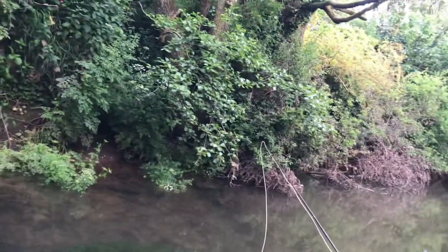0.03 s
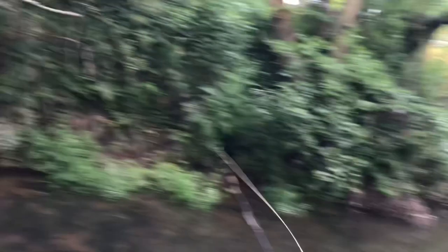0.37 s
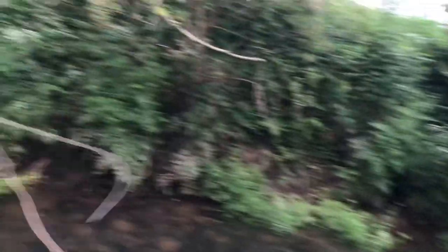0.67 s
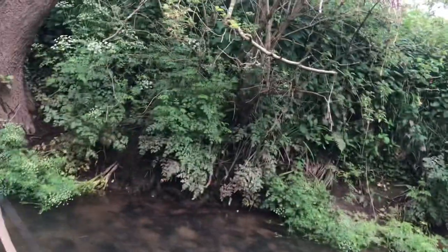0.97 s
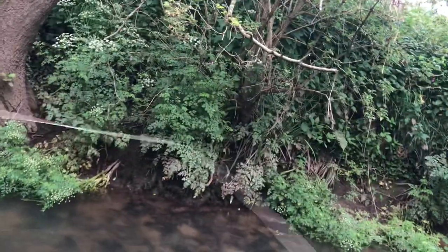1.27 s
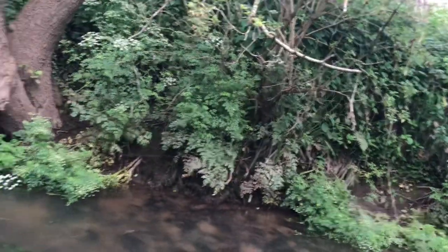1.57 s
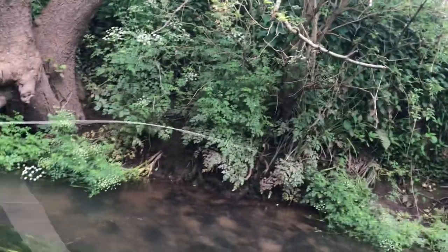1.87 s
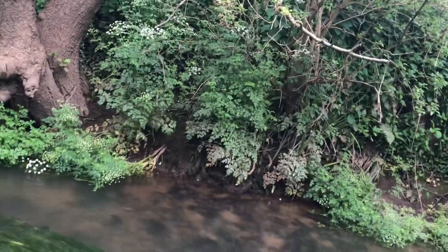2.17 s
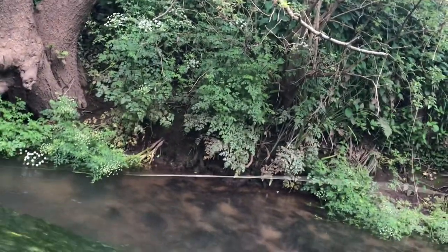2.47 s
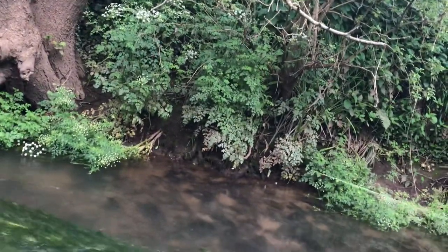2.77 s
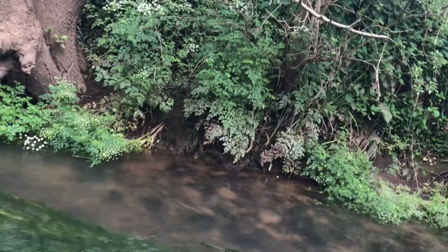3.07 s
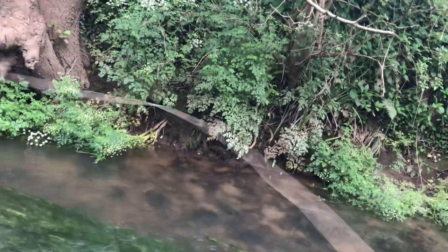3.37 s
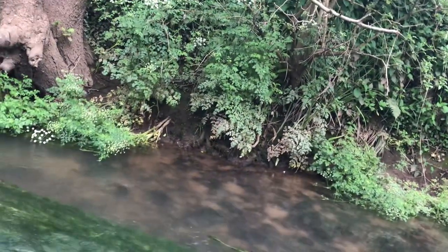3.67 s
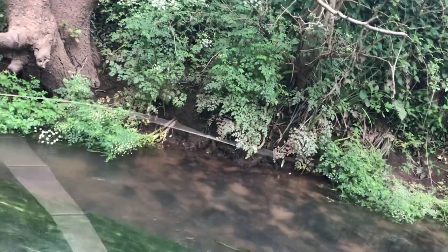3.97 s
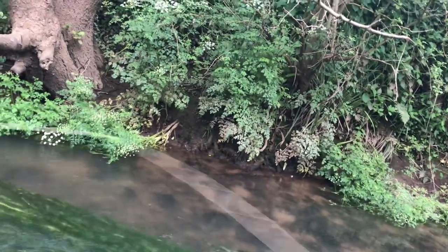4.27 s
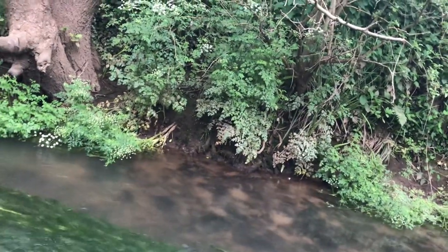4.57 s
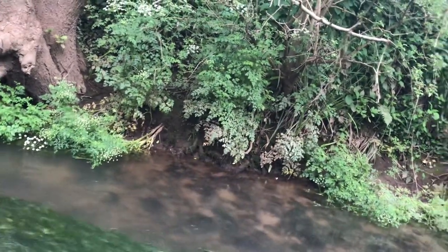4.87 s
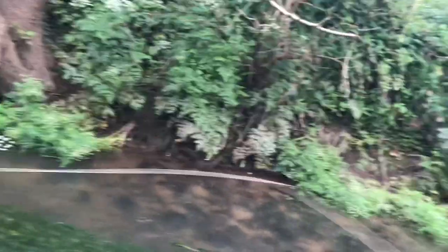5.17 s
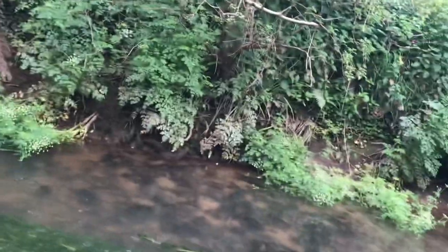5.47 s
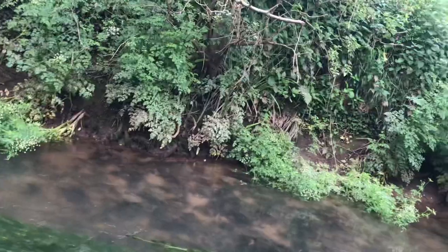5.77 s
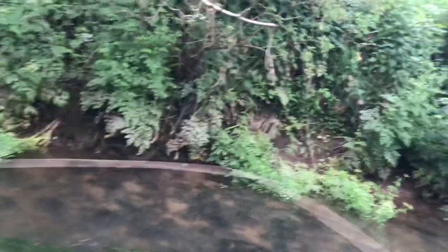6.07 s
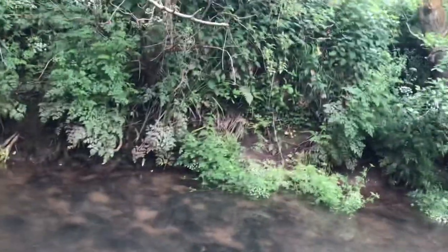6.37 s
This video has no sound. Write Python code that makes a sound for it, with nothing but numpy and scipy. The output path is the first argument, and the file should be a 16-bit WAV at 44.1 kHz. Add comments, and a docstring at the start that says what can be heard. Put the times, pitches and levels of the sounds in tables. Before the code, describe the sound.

A soft murmur of slow water and open air runs throughout, about six and a half seconds, with faint far bird whistles. At 0.5 seconds a songbird gives a short harsh rasp, running into a rapid, high, slightly hoarse trill from 0.7 to 1.8 seconds. After faint twitters near 3.2 seconds, it sings a louder phrase from 3.5 to 5.3 seconds: quick notes dropping in pitch, then high, partly buzzy whistles stepping downward, echoing lightly among trees. Close by, a fly line slides through rod rings in short hissing pulls with thin falling zips, faint from about 1 second and stronger from 3.7 to 6.2 seconds. It ticks sharply against the rod around 2.4, 3.9 and 4.7 seconds, and several times after 5.9. Small water plops come near 3, 3.3 and 5.2 seconds and just after 6.

```python
"""A songbird on a wooded river bank gives a harsh rasp, a rapid two-voiced trill, then a louder phrase of
falling whistles. The two sides of its syrinx sound the trill together; trunks and leaves scatter the song.
Close by, a fly line is cast and drawn in: sliding friction in the rod rings makes it hiss, and its impacts
on the rod tick. Air pockets resonate as small plops. Behind lie faint far whistles and twitters,
lingering echoes of the song and the murmur of slow water."""
import sys
import numpy as np
from scipy import signal
from scipy.fft import rfft, irfft, next_fast_len
from scipy.io import wavfile
from scipy.ndimage import uniform_filter1d, map_coordinates

SR = 44100
rng = np.random.default_rng(int(sys.argv[2]) if len(sys.argv) > 2 else 0)


def waveform_to_disk(signal):
    """Save audio, clipped to [-1, 1], as 16-bit WAV at the path in sys.argv[1]."""
    frames = np.transpose(np.atleast_2d(signal))
    scaled = np.clip(frames, -1, 1) * 32767
    samples = np.round(scaled).astype(np.int16)
    wavfile.write(sys.argv[1], SR, samples)


N = 287701
T = np.arange(N) / SR

# Whistles of the loud phrase:
# (time [s], duration [s], start pitch [Hz], middle pitch [Hz], end pitch [Hz], level [dB], buzz depth [Hz])
PHRASE_NOTES = [(3.457, .045, 6390, 6585, 6420, -57, 5), (3.497, 0.036, 5960, 6440, 6450, -52.5, 0),
                (3.53, 0.041, 5910, 6114, 5790, -48.5, 0), (3.547, 0.025, 6030, 5220, 3540, -44.5, 0),
                (3.614, 0.023, 3990, 3820, 3840, -38.5, 11), (3.634, 0.021, 3650, 3310, 3090, -45.5, -3),
                (3.681, 0.0284, 3290, 3037, 3280, -41, 36), (3.758, 0.031, 2896, 2960, 3510, -46, -2),
                (3.877, 0.046, 3090, 3087, 3100, -54.5, 0), (4.006, 0.044, 5740, 6590, 6480, -48, 26),
                (4.05, 0.087, 6455, 6430, 6180, -42, 260), (4.221, .033, 6480, 6650, 6590, -43, 0),
                (4.227, 0.047, 6320, 6235, 5940, -40, 53), (4.246, 0.066, 6200, 6116, 6260, -41.5, 353),
                (4.368, 0.049, 6160, 6290, 6420, -42.5, 0), (4.39, 0.098, 6215, 5964, 5800, -42.5, -2),
                (4.592, .11, 6160, 5817, 5740, -45.5, 55), (4.596, 0.13, 7460, 6740, 6500, -49.5, 72),
                (4.828, .018, 5830, 6260, 6360, -49.5, 55), (4.831, 0.049, 5380, 5110, 5040, -44.5, 101),
                (4.866, 0.086, 4960, 4796, 4770, -44, 15), (4.97, 0.057, 4925, 5090, 5006, -44.5, 7),
                (5.082, 0.04, 3947, 4130, 4246, -40.5, -2), (5.107, 0.1, 4160, 4095, 4093, -44, 29),
                (5.196, 0.098, 4510, 4640, 4540, -49.5, 4)]
# Faint far whistles and twitters, and lingering echoes of the songbird's trill and phrase
# (the steady tones at 1.869, 3.88 and 4.245 s); columns as in PHRASE_NOTES
FAR_CALLS_AND_ECHOES = [(-.02, 0.092, 1960, 1880, 1840, -70.5, 0),
                        (.21, 0.051, 2520, 2517, 2560, -72.5, -3), (.401, .096, 2680, 2620, 2760, -76, 0),
                        (1.869, 0.14, 4120, 3995, 4010, -72, 3), (2.6, 0.12, 2297, 2268, 2190, -69.5, -2),
                        (2.76, 0.092, 2270, 2140, 1936, -66.5, 69),
                        (3.145, .03, 4880, 3800, 3440, -58, 500),
                        (3.21, 0.071, 5900, 5820, 5800, -68.5, 398),
                        (3.277, .042, 6070, 4780, 3780, -56.5, 495),
                        (3.384, 0.032, 4750, 5230, 5740, -58.5, 400),
                        (3.65, 0.174, 2130, 2140, 2230, -72.5, -2),
                        (3.88, 0.185, 3380, 3410, 3380, -71.5, 0), (4.09, 0.24, 1923, 2146, 1910, -71.5, 3),
                        (4.245, .11, 3520, 3545, 3530, -71.5, 0),
                        (6.451, 0.093, 2920, 3450, 3670, -72, 157)]
# Syllables of the trill: (time [s], level [dB])
TRILL_ONSETS = [(.72, -55), (0.791, -54), (.868, -57.5), (0.947, -57), (1.045, -59.5), (1.122, -57.5),
                (1.225, -56.5), (1.312, -53), (1.401, -53), (1.49, -52), (1.589, -52.5), (1.686, -51),
                (1.775, -50.5)]
# Course of one syllable, sung by both sides of the syrinx: (time from onset [s], upper pitch [Hz],
# lower pitch [Hz], upper relative level [dB], lower relative level [dB], pitch roughness [fraction])
SYLLABLE_SHAPE = [(0, 6000, 3450, -11, -16, .025), (.006, 6650, 3750, -3, -6, .015),
                  (.014, 7050, 3880, 0, -4, .015), (.022, 6900, 3650, 0, -13, .04),
                  (.028, 5700, 3200, 0, -8, .08), (.034, 5000, 2650, 0, -4, .085),
                  (.042, 3900, 2000, -14, -16, .09)]
# Spectra of the bird's rasp and the line's hiss and rub: (frequency [Hz], relative spectral density [dB])
RASP_SPECTRUM = [(500, -40), (900, -15), (1300, -11), (1700, -11.5), (2300, -10.5), (3000, -0.5),
                 (3600, -5.5), (4200, -5.5), (4800, -19), (5900, -15), (7000, -25), (8300, -21.5),
                 (9500, -51), (13000, -58)]
HISS_SPECTRUM = [(1000, -23.5), (2500, -9.5), (4600, -8), (6600, -6), (7700, -8.5), (9400, -6.5),
                 (10400, -11), (11400, -4), (13000, -3.5), (15800, -8)]
RUB_SPECTRUM = [(600, -19), (1100, -8.5), (1600, -7), (2500, -5.5), (3500, -4.5), (6000, -7.5),
                (10000, -22)]
# Pulls of line through the rings: (time [s], duration [s], hiss gain [dB], rub gain [dB])
LINE_PULLS = [(.95, 0.68, -92, -62.5), (1.753, .19, -54, -70), (2.186, 0.098, -76, -68),
              (2.352, 0.2, -73, -69.5), (2.503, 0.093, -65, -71), (2.764, .17, -63, -63.5),
              (2.837, 0.15, -56.5, -75), (3.126, 0.057, -59.5, -67), (3.17, 0.15, -65, -66),
              (3.355, 0.046, -63, -60), (3.74, 0.25, -52, -59.5), (3.919, 0.034, -49, -56),
              (3.929, 0.14, -56.5, -63.5), (4.283, 0.23, -53.5, -59), (4.46, 0.14, -70, -60),
              (4.564, 0.2, -49, -59.5), (4.662, 0.037, -45, -74), (4.68, 0.23, -52, -57.5),
              (4.833, 0.17, -64, -64), (4.992, .32, -50, -60.5), (5.418, 0.29, -53.5, -62.5),
              (5.64, 0.11, -65.5, -69), (5.759, .16, -59.5, -66.5), (5.903, .17, -55.5, -79),
              (6.046, 0.094, -46.5, -55.5), (6.115, 0.1, -56.5, -75)]
# Creep of the slack line between pulls: (time [s], relative level [dB])
LINE_CREEP = [(0, -7), (.6, -0.5), (1.5, 2), (2.6, -3.5), (3.1, 3.5), (5.4, 7.5), (6.5, 2)]
# Glides of the slowing line: (time [s], duration [s], start frequency [Hz], level [dB])
LINE_ZINGS = [(1.371, 0.034, 13500, -66), (1.837, 0.023, 6200, -62.5), (1.85, .06, 3640, -68),
              (1.864, .11, 13000, -66.5), (2.017, 0.035, 2650, -66), (2.356, 0.16, 12000, -71.5),
              (2.43, 0.055, 4400, -71), (2.86, 0.031, 6580, -65), (2.881, .04, 4300, -64),
              (2.898, 0.12, 13500, -66.5), (3.993, 0.096, 14300, -62.5), (4.339, .046, 2300, -68),
              (4.428, 0.065, 13400, -64), (5.497, 0.083, 15500, -55), (5.526, 0.046, 9600, -53.5),
              (5.564, 0.14, 5400, -67), (5.675, 0.1, 14000, -65.5)]
# Impacts of the line on the rod: (time [s], gain [dB], extra gain of the body [dB])
ROD_TAPS = [(2.434, -40.5, -7), (3.185, -56, 8), (3.927, -35.5, 2), (3.936, -43, -8), (4.681, -25, -30),
            (4.718, -23, -8.5), (4.745, -41, 11), (4.872, -35, -1), (5.276, -45, -2), (5.524, -41, -25),
            (5.92, -43, -14), (6.102, -30, -17), (6.166, -44.5, 2.5), (6.186, -32.5, -10),
            (6.283, -39.5, -5.5), (6.430, -46, -24), (6.447, -43, -32)]
# Air pockets in the water: (time [s], relative level [dB], start pitch [Hz], 60 dB decay time [s])
AIR_POCKETS = [(2.666, -55, 268, 0.045), (2.994, -42.5, 572, 0.018), (3.057, -50, 290, 0.017),
               (3.303, -43.5, 486, 0.016), (3.317, -51.5, 366, 0.054), (4.723, -47, 660, 0.012),
               (5.212, -39.5, 503, 0.02), (6.052, -39, 570, 0.022), (6.277, -41, 486, 0.01),
               (6.284, -38.5, 950, 0.0086)]
# Spectrum of slow water and open air: (frequency [Hz], relative spectral density [dB])
RIVER_SPECTRUM = [(15, -32), (25, -3), (59, -0.5), (165, -10), (194, -9), (255, -9), (500, -14.5),
                  (620, -14), (1640, -22), (1820, -19.5), (2260, -25.5), (2590, -24), (6490, -33),
                  (8970, -29), (15800, -37.5)]
# Slow swell of the murmur: (time [s], relative level [dB])
RIVER_SWELL = [(0.0, -70.5), (1.05, -68), (4.28, -70), (5.9, -70), (6.21, -66), (6.52, -69.5)]


def whistle(length, start_hz, middle_hz, end_hz, buzz_hz, overtone_db,
            flutter_hz=135, edge_s=0.0013, unsteady=0.0016):
    """Frequency modulation: fast flutter of the syrinx adds a buzz to a gliding, nearly pure tone."""
    t = np.arange(int(length * SR)) / SR
    hz = np.polyval(np.polyfit([0, .5, 1], [start_hz, middle_hz, end_hz], 2), t / length)
    flutter = np.sin(cycles(flutter_hz * (1 + 0.14 * wobble(64, len(t)))))
    waver = 1 + unsteady * wobble(256, len(t))
    phase = cycles(hz * waver + buzz_hz * flutter)
    gate = np.sin(np.pi / 2 * np.clip(np.minimum(t, length - t) / edge_s, 0, 1)) ** 2
    return unit(gate * (np.sin(phase) + amp(overtone_db) * np.sin(2 * phase)))


def phrase(overtone_db=-19):
    """Harmonic distortion: in the loud run of whistles, high notes sung hard are the least pure."""
    out = np.zeros(N)
    for s, length, start, middle, end, db, buzz in PHRASE_NOTES:
        strain_db = 1.8 * (db + 40.5) + 30 * np.log2(middle / 6300)
        note = amp(db) * whistle(length, start, middle, end, buzz, overtone_db + strain_db)
        add(out, s, among_trees(note, wet_db=1.5, t60=0.3, far_db=-9.5))
    return out


def trill(sum_tone_db=-16, first_wet_db=6, rise_s=0.138, hoarseness=0.01):
    """Biphonation: two voices arch, then plunge and break up; their coupling adds a weak sum tone."""
    out = np.zeros(N)
    t = np.arange(int(SYLLABLE_SHAPE[-1][0] * SR)) / SR
    upper_hz, lower_hz, upper_db, lower_db, roughness = curves(SYLLABLE_SHAPE, t)
    first_s, last_s = TRILL_ONSETS[0][0], TRILL_ONSETS[-1][0]
    for s, db in TRILL_ONSETS:
        age = s - first_s
        detune = 1 + .012 * rng.standard_normal()
        tuning = detune * np.interp(age, [0, rise_s], [.94, 1])  # the trill starts a little flat
        veil = 1 - age / (last_s - first_s)  # early syllables are hoarser and richer in echoes
        jitter = roughness + hoarseness * (.5 + veil)
        upper_phase = cycles(tuning * upper_hz * (1 + jitter * wobble(1410, len(t))))
        lower_phase = cycles(tuning * lower_hz * (1 + jitter * wobble(1393, len(t))))
        sum_tone = amp(sum_tone_db) * np.sin(upper_phase + lower_phase)
        voices = amp(upper_db) * np.sin(upper_phase) + amp(lower_db) * (np.sin(lower_phase) + sum_tone)
        add(out, s, among_trees(amp(db) * unit(voices), wet_db=veil * first_wet_db, t60=0.42, far_db=-12))
    return out


def rasp(start_s=0.547, level_db=-49.5, attack_s=0.032, hold_s=.14, t60=0.41, rough_db=-0.5):
    """Aperiodic sound has no pitch: a scrape of noise opens the song, swells and decays exponentially."""
    grain = rng.standard_normal(N) * amp(rough_db * wobble(350))
    age = np.maximum(T - start_s, 0)
    swell = 1 - np.exp(-age / attack_s)
    decay_db = 60 * np.maximum(age - hold_s, 0) / t60
    return swell * amp(level_db - decay_db) * coloured(grain, RASP_SPECTRUM)


def among_trees(x, wet_db, t60, far_db, woods_t60=.55):
    """Scattering: echoes off near trunks and leaves follow the direct sound, with a tail from far woods."""
    t = np.arange(SR * 3 // 4) / SR
    spray = rng.standard_normal(len(t)) ** 3  # cubing makes a few echoes stand out
    near = spray * amp(-60 * t / t60) * (1 - np.exp(-t / 0.0012))
    far = rng.standard_normal(len(t)) * amp(-60 * t / woods_t60) * (1 - np.exp(-t / .05))
    response = amp(wet_db) * near / np.linalg.norm(near) + amp(far_db) * far / np.linalg.norm(far)
    response[0] = 1  # the direct path
    return signal.fftconvolve(x, response / np.linalg.norm(response))


def fly_line(rub_db=-2, free_db=-4, held_db=1):
    """Sliding friction: line running through the rings gives a bright hiss over a duller rub."""
    hiss_gain, rub_gain = pull_gains()
    hiss = coloured(friction(), HISS_SPECTRUM)
    rub = coloured(friction(), RUB_SPECTRUM)
    low_band = filtered(hiss, lambda hz: 1 / (1 + (hz / 7500) ** 6))
    # free line in the air hisses thinly; drawn in by hand at the end it is fuller
    grip = amp(np.interp(T, [5.2, 5.5], [free_db, held_db]))
    return hiss_gain * (hiss + (grip - 1) * low_band) + amp(rub_db) * rub_gain * rub


def pull_gains(hiss_exponent=1.2, rub_exponent=0.74, idle_hiss_db=-78, idle_rub_db=-72, uneven_db=4):
    """Power law: hiss and rub grow with the line's speed in each pull; slack line creeps in between."""
    creep = amp(curves(LINE_CREEP)[0] + uneven_db * wobble(6.3))
    hiss_power = (amp(idle_hiss_db) * creep) ** 2
    rub_power = (amp(idle_rub_db) * creep) ** 2
    for s, length, hiss_db, rub_db in LINE_PULLS:
        speed = np.abs(np.sin(np.linspace(0, np.pi, int(length * SR))))
        add(hiss_power, s, (amp(hiss_db) * speed ** hiss_exponent) ** 2)
        add(rub_power, s, (amp(rub_db) * speed ** rub_exponent) ** 2)
    return np.sqrt(hiss_power), np.sqrt(rub_power)


def friction(grain_db=1.6, flicker_db=1.6, patch_db=2.5):
    """Random amplitude modulation: fine friction grains, made patchy in both frequency and time."""
    grains = rng.standard_normal(N) * amp(grain_db * wobble(1500) + flicker_db * wobble(70))
    spectra = signal.stft(grains, nperseg=512)[2]
    patches = uniform_filter1d(rng.standard_normal(spectra.shape), size=6, axis=0)  # about 500 Hz wide
    patches = uniform_filter1d(patches, size=6, axis=1)  # about 35 ms long
    return signal.istft(spectra * amp(patch_db * unit(patches)), nperseg=512)[1][:N]


def zings(spread=.15, end_ratio=.57):
    """Passage rate sets pitch: the line's texture crosses a ring ever more slowly, so a noise band falls."""
    out = np.zeros(N)
    for s, length, start_hz, db in LINE_ZINGS:
        size = int(length * SR)
        hz = np.geomspace(start_hz, end_ratio * start_hz, size)
        phase, width_hz = cycles(hz), spread * (hz[0] + hz[-1])
        band = wobble(width_hz, size) * np.cos(phase) + wobble(width_hz, size) * np.sin(phase)
        add(out, s, amp(db) * unit(band * np.sin(np.linspace(0, np.pi, size))))
    return out


def ticks(snap_db=-6, knock_db=-5, t60=.012):
    """Impact excitation: the line taps the rod, giving a bright, quickly damped snap with a little body."""
    out = np.zeros(N)
    t = np.arange(SR // 20) / SR
    for s, db, body_db in ROD_TAPS:
        snap = coloured(rng.standard_normal(len(t)), [(1000, -28), (5000, -13), (10000, 2), (13000, 6.5)])
        body = coloured(rng.standard_normal(len(t)), [(700, -9), (1600, 2.5), (4000, 3.5), (8000, -4.5)])
        add(out, s, amp(db - 60 * t / t60) * (amp(snap_db) * snap + amp(body_db + knock_db) * body))
    return out


def plops(rise_per_s=3, attack_s=0.0005, gain_db=3):
    """Bubble resonance: each plop is a short-lived air pocket whose pitch rises as it rings."""
    out = np.zeros(N)
    t = np.arange(SR // 12) / SR
    for s, db, hz, t60 in AIR_POCKETS:
        envelope = amp(db + gain_db - 60 * t / t60) * (1 - np.exp(-t / attack_s))
        add(out, s, envelope * np.sin(cycles(hz * (1 + rise_per_s * t))))
    return out


def far_calls_and_echoes():
    """Reverberation: faint far whistles and twitters, and lingering echoes of the trill and phrase."""
    out = np.zeros(N)
    for s, length, start, middle, end, db, buzz in FAR_CALLS_AND_ECHOES:
        note = whistle(length, start, middle, end, buzz, overtone_db=-28, edge_s=.008, unsteady=0.0032)
        add(out, s, among_trees(amp(db) * note, wet_db=2.5, t60=0.13, far_db=-1.5))
    return out


def river(gain_db=4, ripple_db=1):
    """Broadband ambient noise: slow water and open air make a soft, slightly uneven murmur."""
    level_db = curves(RIVER_SWELL)[0] + gain_db + ripple_db * wobble(14)
    return amp(level_db) * coloured(rng.standard_normal(N), RIVER_SPECTRUM)


def amp(db):
    """Decibel law: amplitude grows tenfold every 20 dB."""
    return 10 ** (np.asarray(db) / 20)


def unit(x):
    """Normalisation to rms 1."""
    return x / np.sqrt(np.mean(x ** 2) + 1e-20)


def curves(rows, t=T):
    """Linear interpolation of each column after the time."""
    times, *columns = np.transpose(rows)
    return [np.interp(t, times, column) for column in columns]


def wobble(rate, size=N):
    """Spline interpolation of random knots, rate of them a second."""
    knots = rng.standard_normal(int(size * rate / SR) + 4)
    return map_coordinates(knots, [np.arange(size) * rate / SR])


def cycles(hz):
    """Phase in radians, the time integral of angular frequency."""
    return 2 * np.pi * np.cumsum(hz) / SR


def filtered(x, response):
    """Linear filtering: the spectrum of x times a frequency response."""
    size = next_fast_len(len(x) + 8192)
    return irfft(rfft(x, size) * response(np.fft.rfftfreq(size, 1 / SR)), size)[:len(x)]


def coloured(x, spectrum):
    """Spectral shaping by (frequency [Hz], level [dB]) points, scaled to rms 1."""
    points_hz, db = np.transpose(spectrum)
    return unit(filtered(x, lambda hz: amp(np.interp(np.log(hz + 1), np.log(points_hz), db))))


def add(track, s, sound):
    """Superposition of a sound on a track, starting at s seconds."""
    start = round(s * SR)
    part = sound[max(-start, 0):max(N - start, 0)]
    track[max(start, 0):][:len(part)] += part


def scene():
    """Superposition: the song, far calls and echoes, the angler's line and the water sum in one channel."""
    birds = rasp() + trill() + phrase() + far_calls_and_echoes()
    return (birds + fly_line() + zings() + ticks() + plops() + river())[None]


def record(dry, low_hz=37, top_hz=15900):
    """Band limiting: the deepest bass rolls off and nothing above top_hz passes."""
    def passband(hz):
        return (hz < top_hz) * hz ** 4 / (hz ** 4 + low_hz ** 4)
    return np.array([filtered(channel, passband) for channel in dry])


dry = scene()
out = record(dry)
waveform_to_disk(out)
```